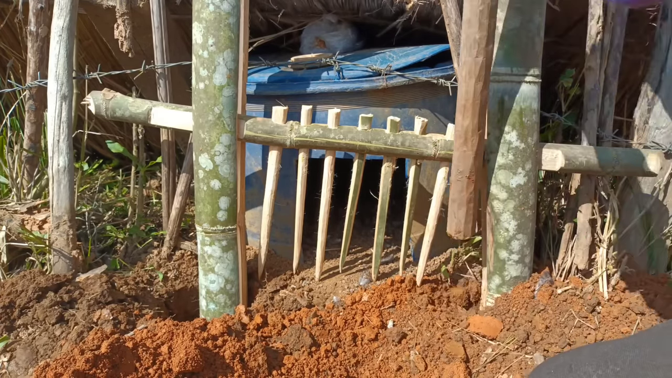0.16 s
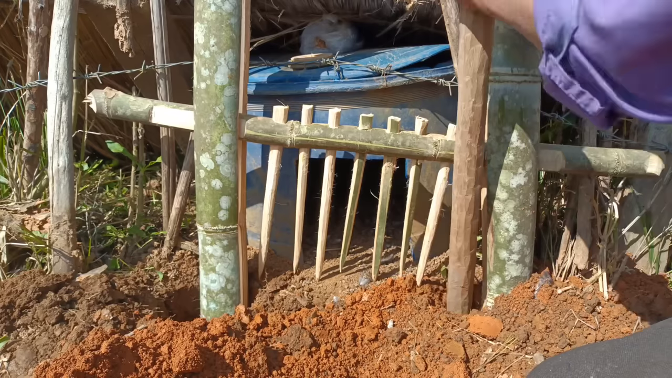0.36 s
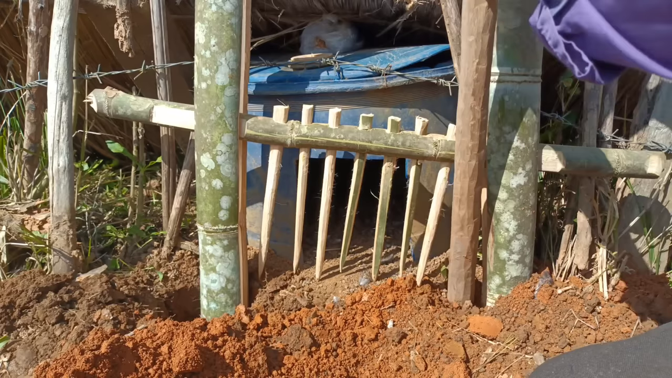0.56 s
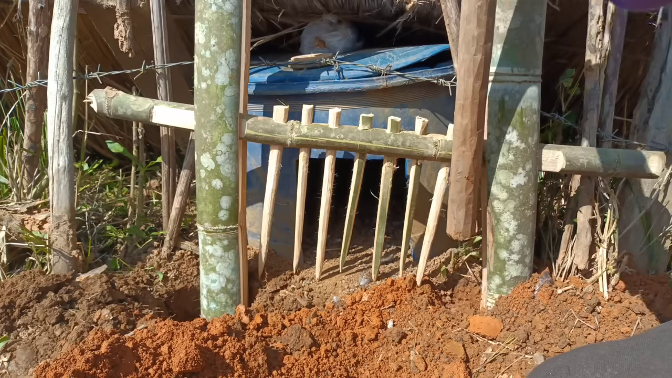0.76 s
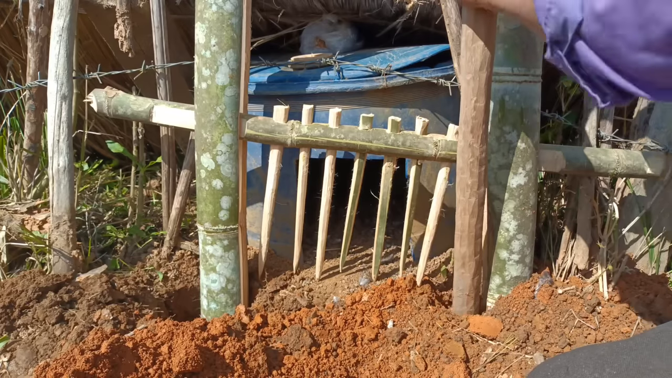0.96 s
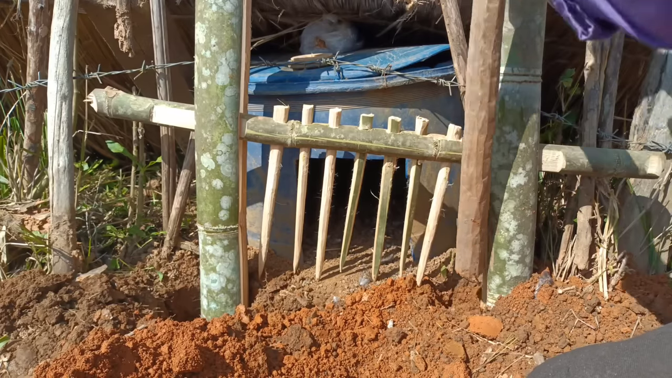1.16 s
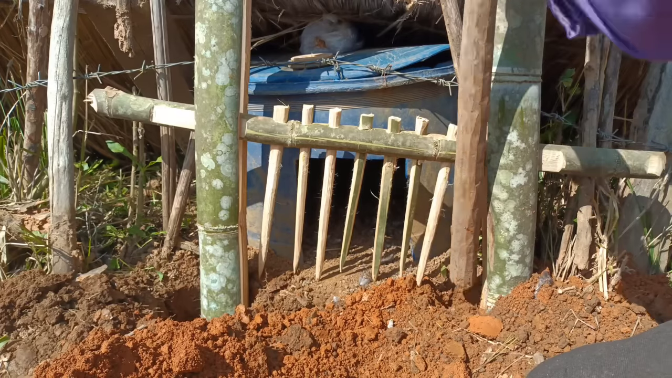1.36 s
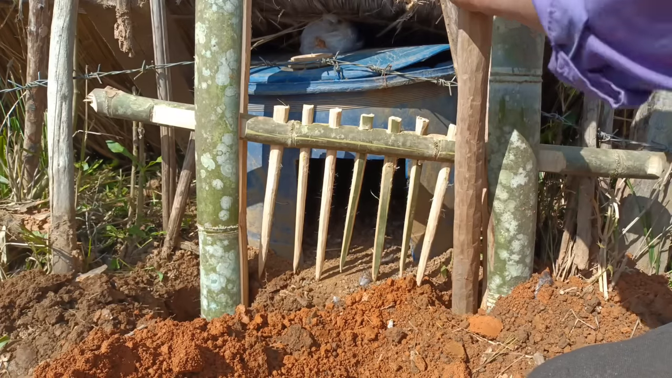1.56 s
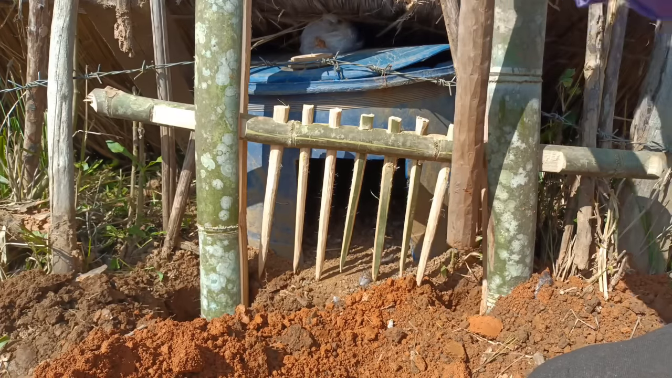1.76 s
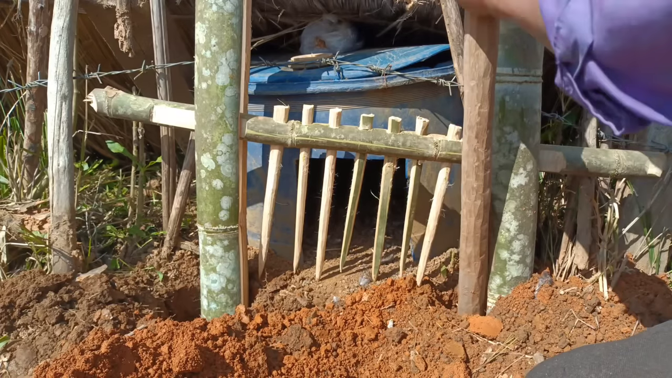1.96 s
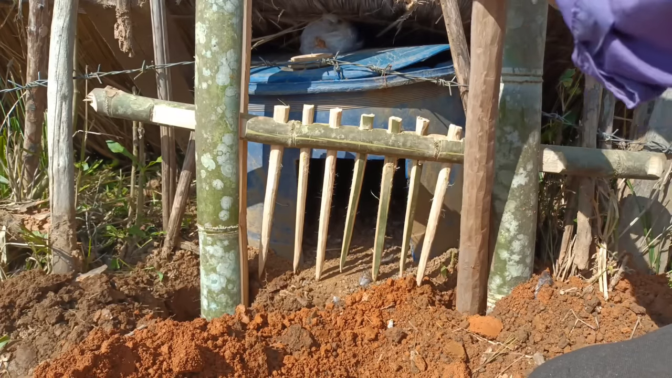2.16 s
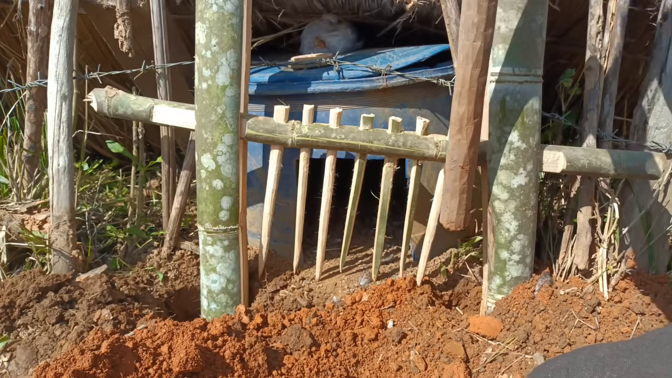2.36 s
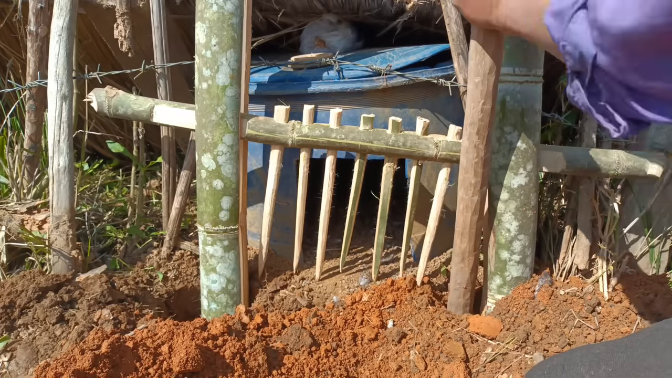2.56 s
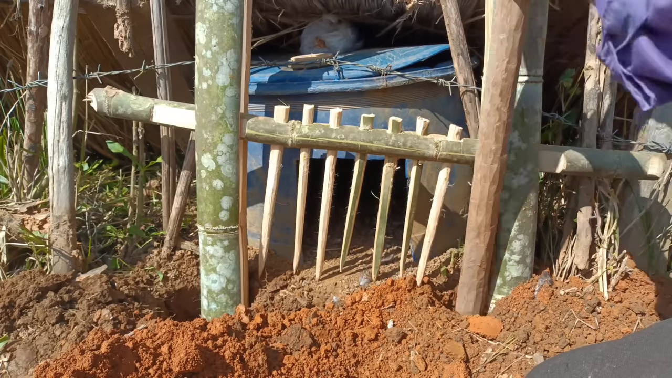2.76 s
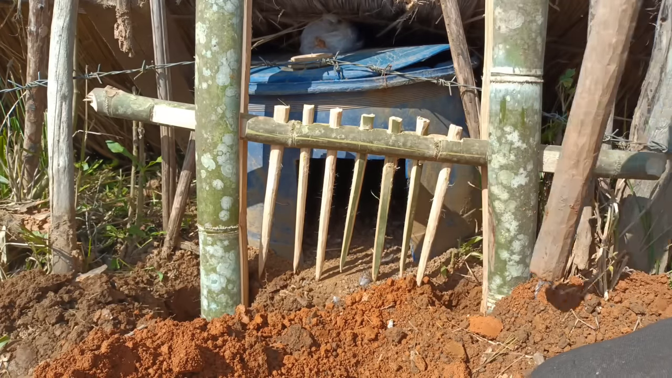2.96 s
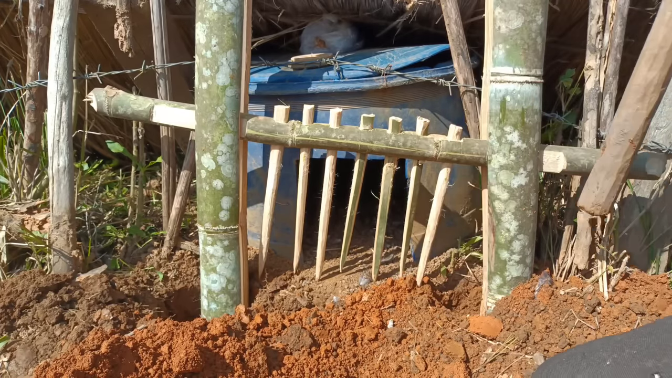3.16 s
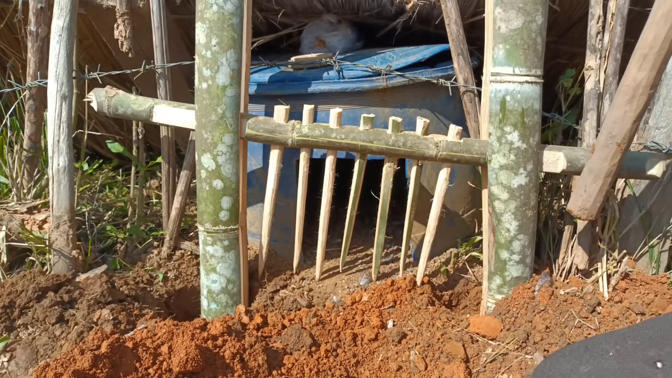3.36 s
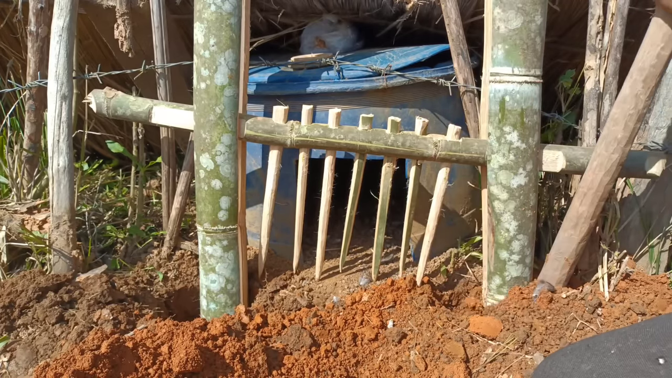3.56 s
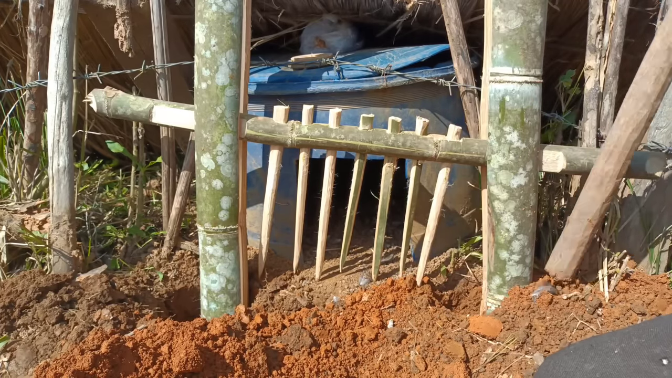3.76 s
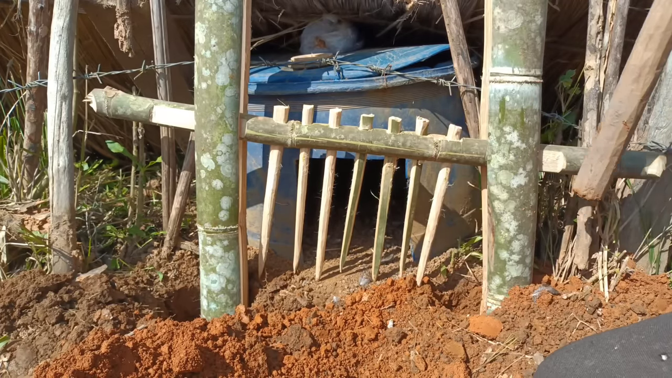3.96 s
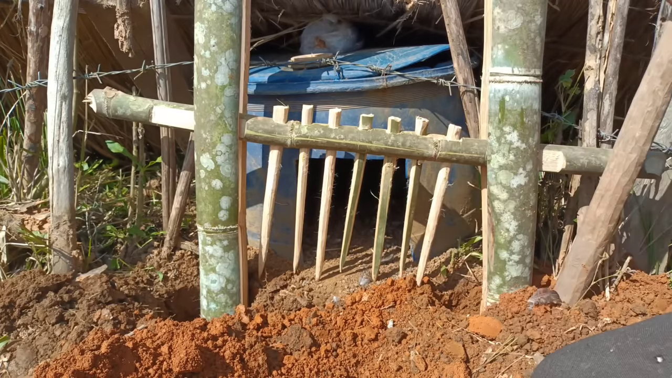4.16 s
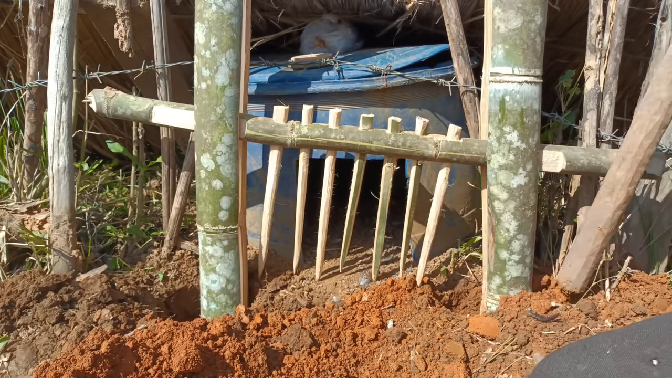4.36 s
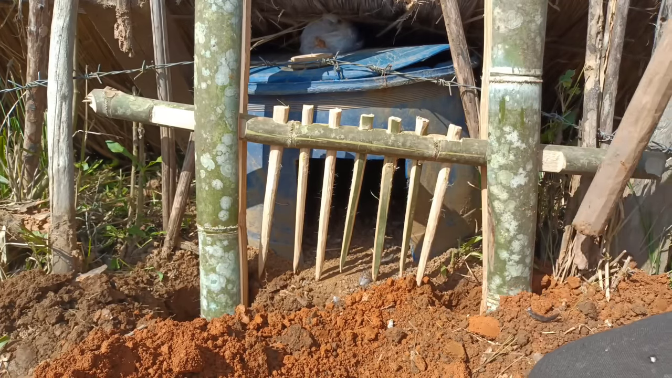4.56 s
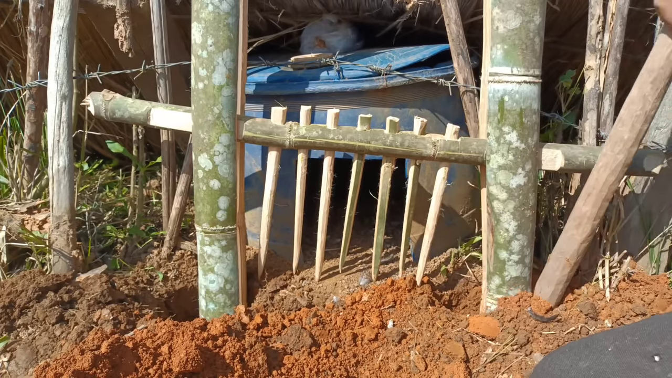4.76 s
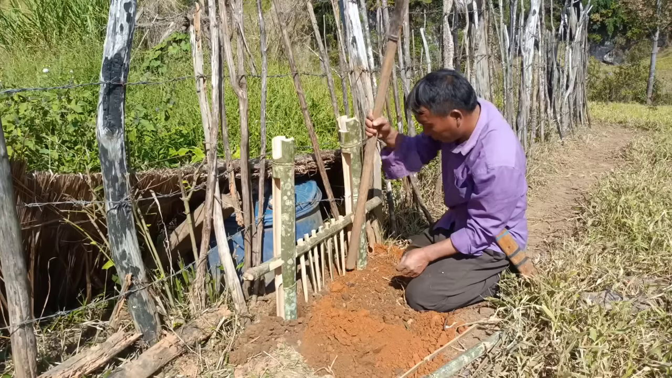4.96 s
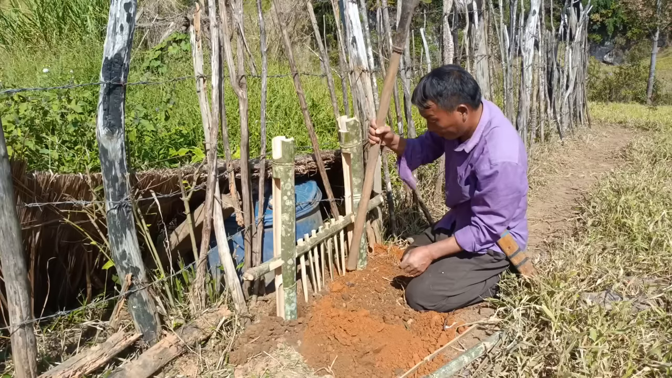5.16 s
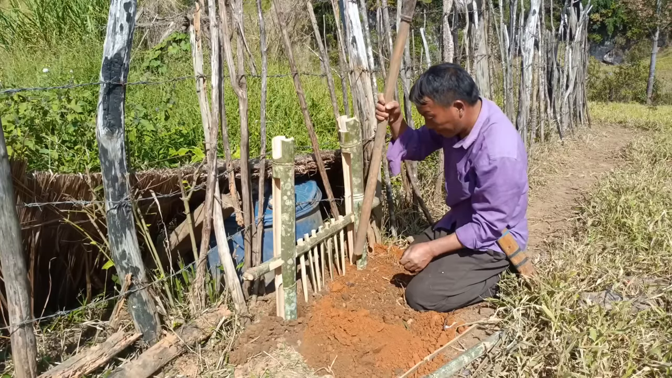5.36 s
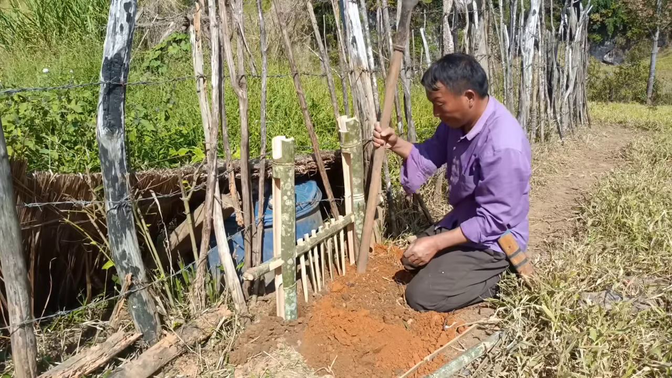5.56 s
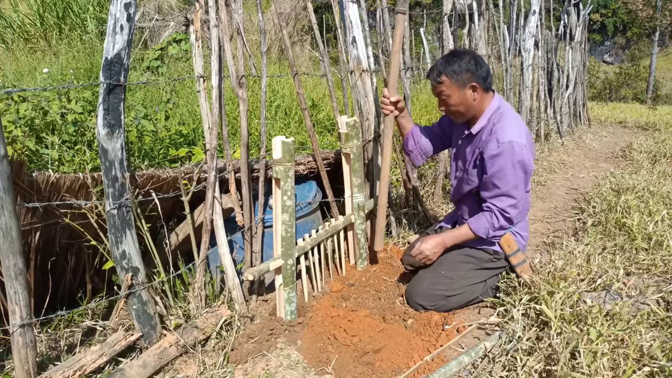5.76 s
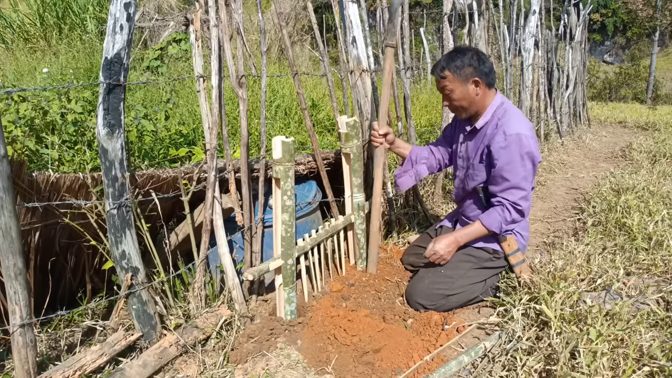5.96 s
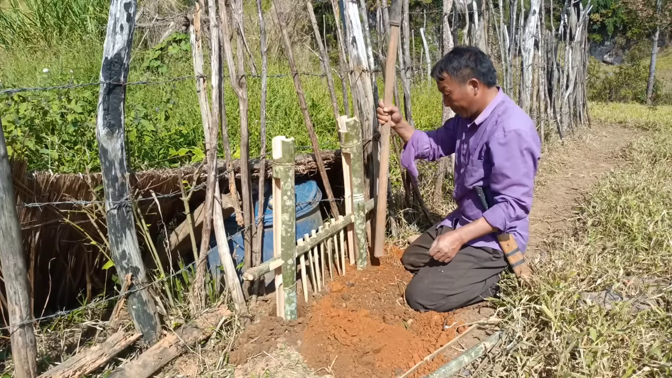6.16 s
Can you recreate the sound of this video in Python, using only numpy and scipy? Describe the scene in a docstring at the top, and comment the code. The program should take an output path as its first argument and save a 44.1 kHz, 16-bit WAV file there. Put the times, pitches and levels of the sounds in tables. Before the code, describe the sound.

A wooden stake tamps loose soil around a bamboo post outdoors, close by and slightly right, with almost no echo. After a tiny scrape and light knocks from 0.1 s, strokes land at about 0.4, 0.95, 1.5, 2.05 and 2.6 s. Each is a dry woody crack, a short gritty crunch with scattering crumbs, and a low thud; the last two push deepest. A pause holds faint drags and very faint bird calls near 3.3 s. Softer, crumbly strokes follow at 3.5 and 4.15 s, then sharper hollow knocks around 4.7 s. Packed soil thuds tighter at 5.05, 5.5 and 6.0 s, with small slides and taps around 5.3 s. Metal clinks at 5.06 s and more brightly at 6.1 s. Light wind rumble, soft puffs on the left, mostly 1.3 to 2.5 s, and thin leaf hiss stay behind, with a barely perceptible low hum midway.

```python
"""A wooden stake tamps loose soil around a bamboo fence post, about twice a second, on a quiet day outdoors.
Tip on clods or shaft on post: a noise crack plus decaying modes. Crumbs: random grains swelling into each landing.
Ground: a low push, then modes that rise in pitch and shorten as the soil packs; the post answers dully.
Drags and slides are bands of small slips; two metallic clinks near the end are a tick plus ringing modes.
Behind: filtered-noise wind rumble and leaf hiss, eddy pulses on the left, faint bird calls and a low hum."""
import sys
import numpy as np
from scipy import signal
from scipy.fft import rfft, irfft, next_fast_len
from scipy.io import wavfile

SR = 44100
rng = np.random.default_rng(int(sys.argv[2]) if len(sys.argv) > 2 else 0)


def waveform_to_disk(signal):
    """Save audio, clipped to [-1, 1], as 16-bit WAV at the path in sys.argv[1]."""
    frames = np.transpose(np.atleast_2d(signal))
    scaled = np.clip(frames, -1, 1) * 32767
    samples = np.round(scaled).astype(np.int16)
    wavfile.write(sys.argv[1], SR, samples)


N = 273861
AGE_S = np.arange(SR // 2) / SR    # time axis of one event


def from_db(db):
    """Amplitude ratio of a level in dB."""
    return 10 ** (np.asarray(db) / 20)


def rms_one(x):
    """Scale to unit rms over all channels."""
    return x / np.sqrt(np.mean(x ** 2) + 1e-20)


def white(*shape):
    """Gaussian white noise."""
    return rng.standard_normal(shape)


def dying(age_s, t60_s):
    """Gain of a free decay, -60 dB at t60."""
    return np.exp(-np.log(1000) * age_s / t60_s)


def onset(rise_s):
    """Exponential rise towards full level."""
    return 1 - np.exp(-AGE_S / rise_s)


def swell(half_s):
    """Gaussian rise and fall about the middle of the event; half_s is its sigma."""
    return np.exp(-((AGE_S - AGE_S.mean()) / half_s) ** 2 / 2)


def curve(points, s):
    """Read a (time, value) table by linear interpolation."""
    return np.interp(s, *np.transpose(points))


def at_hz(points, hz):
    """Read a spectrum on a log-frequency axis."""
    point_hz, value = np.transpose(points)
    return np.interp(np.log(hz + 1), np.log(point_hz), value)


def cut(x, hz, kind="low", order=2):
    """Butterworth low- or high-pass."""
    sos = signal.butter(order, np.clip(hz, 10, SR * .45), kind, fs=SR, output="sos")
    return signal.sosfilt(sos, x)


def add(out, s, sound):
    """Mix a sound in from time s, trimmed to the scene."""
    start = round(s * SR)
    sound = sound[..., max(-start, 0):N - start]
    first = max(start, 0)
    out[:, first:first + sound.shape[-1]] += sound


# place of the blows: (t/s, left-channel lag/s)
PLACE = [(2.8, .00004), (3.2, 0.00021), (4.85, .00015), (4.9, .000005)]


def placed(pair, s):
    """The sound reaches the left channel a little later than the right."""
    lag = round(abs(curve(PLACE, s)) * SR)
    left = np.pad(pair[0], (lag, 0))[:pair.shape[1]]
    return np.array([left, pair[1]])


def coloured(pair, spectrum, likeness, tilt_db=0):
    """Two unrelated noises become left and right with a given colour and likeness; rms 1."""
    length = pair.shape[1]
    size = next_fast_len(length)
    hz = np.arange(size // 2 + 1) * SR / size
    octaves = np.log2(np.maximum(hz, 500) / 500)    # tilt acts above 500 Hz
    mid, side = rfft(pair, size) * from_db(at_hz(spectrum, hz) + tilt_db * octaves)
    alike = np.clip(at_hz(likeness, hz), 0, 1)
    spread = np.sqrt(1 - alike) * side * [[1], [-1]]
    return rms_one(irfft(np.sqrt(1 + alike) * mid + spread, size)[:, :length])


def grains(per_s, spread_db):
    """Two random trains of tiny fractures of uneven size."""
    shape = (2, len(AGE_S))
    sizes = from_db(spread_db * np.minimum(rng.exponential(1, shape), 3))
    hits = rng.random(shape) < per_s / SR
    return hits * sizes * rng.choice([-1, 1], shape)


def struck(modes, hardness_hz, vary_db, side_hz, ring=1):
    """A blow rings every mode with a strength of its own; left and right phases part with frequency."""
    hz, level_db, t60_s = np.transpose(modes)[:, :, None]
    gain = from_db(level_db + vary_db * white(*hz.shape))
    gain = gain / np.sqrt(1 + (hz / hardness_hz) ** 4)    # soft contacts excite less treble
    gain = gain / np.sqrt(np.sum(gain ** 2) / 2)
    phase = rng.uniform(0, 2 * np.pi, hz.shape) + 2 * np.pi * hz * AGE_S
    skew = np.minimum(hz / side_hz, np.pi / 4) * rng.choice([-1, 1], hz.shape)
    body = gain * dying(AGE_S, t60_s * ring)
    return np.array([np.sum(body * np.sin(phase + way * skew), axis=0) for way in (-1, 1)])


def narrow(hz, width_hz, size):
    """A wavering tone: noise twice through one narrow resonance, independent per channel."""
    b, a = signal.iirpeak(hz, hz / width_hz, SR)
    once = signal.lfilter(b, a, white(2, size))
    return rms_one(signal.lfilter(b, a, once))


# air noise colour: (f/Hz, relative level/dB)
AIR = [(12, -27), (20, 4.5), (49, -5), (95, -16), (123, -12), (209, -17), (268, -21), (365, -19),
       (456, -20.5), (539, -21.5), (1050, -27.5), (1250, -26.5), (1510, -29.5), (2500, -26.5),
       (15800, -41.5)]
# left-right likeness of the air: (f/Hz, likeness 0-1)
AIR_LIKENESS = [(30, 0.26), (120, 0.58), (500, 0.24), (2000, 0.033), (6000, 0.028)]
# wind rumble before channel gains: (t/s, level/dB)
RUMBLE = [(0.0, -68.5), (1.23, -69), (1.67, -61.5), (1.83, -70), (2.64, -66.5), (4.77, -72), (4.87, -71),
          (5.87, -73.5), (6.2, -70.5)]
# hiss of far leaves before the hiss gain: (t/s, level/dB)
LEAVES = [(0.0, -72.5), (0.33, -73.5), (1.12, -76), (2.81, -74.5), (4.56, -77.5), (5.22, -74.5),
          (5.65, -76), (6.2, -75)]


def breeze(windward_db, lee_db, hiss_gain_db, rustle_db):
    """Light air rumbles, a little more on the left, and rustles unevenly in the far leaves."""
    t_s = np.arange(N) / SR
    air = coloured(white(2, N), AIR, AIR_LIKENESS)
    rumble = rms_one(cut(air, 230, order=3))
    rest = cut(air, 270, "high", order=3)
    hiss = 0
    # peel off bands from the bottom; each flickers on its own
    for hz in np.geomspace(600, 14000, 9):
        band = signal.sosfiltfilt(signal.butter(2, hz, fs=SR, output="sos"), rest)
        rest = rest - band
        hiss = hiss + band * from_db(rustle_db * rms_one(cut(white(N), 7.5)))
    rumble_gain = from_db(curve(RUMBLE, t_s) + np.array([[windward_db], [lee_db]]))
    hiss_gain = from_db(curve(LEAVES, t_s) + hiss_gain_db)
    return rumble_gain * rumble + hiss_gain * rms_one(hiss + rest)


# strongest puffs of wind on the left: (t/s, peak level/dB, half width/s)
PUFFS = [(1.284, -36.5, 0.0041), (1.553, -35.5, 0.0032), (1.608, -37, 0.0039), (1.765, -32, 0.0042),
         (1.784, -32.5, 0.0022), (1.813, -30.5, 0.0034), (1.988, -39.5, .0033), (2.512, -39.5, 0.0047)]
# weaker random eddies; peaks relative to the RUMBLE table
EDDIES_PER_S, EDDY_OVER_TABLE_DB, EDDY_SPREAD_DB, EDDY_HALF_WIDTH_S = 7, 13.5, 1.5, 0.0039


def puffs(right_db):
    """Eddies cross the left channel as single soft pressure swings, the random ones following the wind."""
    out, lead_s = np.zeros((2, N)), .05
    times_s = np.flatnonzero(rng.random(N) < EDDIES_PER_S / SR) / SR
    peaks_db = curve(RUMBLE, times_s) + EDDY_OVER_TABLE_DB + EDDY_SPREAD_DB * white(len(times_s))
    eddies = [(s, peak_db, EDDY_HALF_WIDTH_S) for s, peak_db in zip(times_s, peaks_db)]
    for s, level_db, half_width_s in [*PUFFS, *eddies]:
        u = (AGE_S - lead_s) / half_width_s
        swing = (1 - u ** 2) * np.exp(-u ** 2 / 2)
        add(out, s - lead_s, from_db([[level_db], [level_db + right_db]]) * swing)
    return out


# dragging wood, sliding earth: (middle t/s, level/dB, half length/s, centre f/Hz, slips/s)
SCRAPES = [(0.07, -70.5, 0.046, 2190, 1000), (0.117, -57.5, .008, 3220, 6600),
           (0.622, -73, 0.039, 1940, 1100), (2.848, -71.5, 0.04, 2010, 400),
           (3.062, -67.5, 0.051, 5300, 10000), (3.942, -64.5, 0.015, 365, 1600),
           (4.143, -50, 0.0043, 3130, 2500), (5.287, -62.5, 0.013, 700, 1000),
           (5.347, -54, 0.021, 910, 1800), (5.439, -68.5, 0.0094, 1000, 1900),
           (5.824, -74, 0.093, 5900, 3400)]
# left-right likeness of soil sounds: (f/Hz, likeness 0-1)
SOIL_LIKENESS = [(400, 1), (2000, 0.46), (4000, 0.68), (8000, 0.062)]


def scrapes(skirt_db):
    """Uneven little slips under a smooth swell, in a broad band."""
    out = np.zeros((2, N))
    for s, level_db, half_s, hz, per_s in SCRAPES:
        band = [(hz * 2. ** octave, -skirt_db * octave ** 2) for octave in range(-3, 4)]
        rub = coloured(grains(per_s, spread_db=1.5), band, SOIL_LIKENESS)
        add(out, s - AGE_S.mean(), from_db(level_db) * rub * swell(half_s))
    return out


# wood contacts: (t/s, level/dB, share taken by the post 0-1, tock level/dB, tock f/Hz)
KNOCKS = [(0.111, -54, 0.3, -53, 2430), (.215, -41, 0.72, -47, 676), (0.225, -42, 0.93, -44.5, 445),
          (0.285, -53.5, 0.64, -55, 553), (.361, -32.5, 0.6, -52, 660), (0.389, -41, 0.64, -44, 3500),
          (.401, -39, 0, -42, 2530), (0.9431, -40.5, 0.37, -48, 2510), (.954, -38, 0.41, -39.5, 2530),
          (1.4845, -37.5, 0.7, -59, 650), (1.4902, -29, 0.11, -37, 650), (2.042, -37.5, 0.58, -49, 572),
          (2.052, -34.5, 0.15, -39, 683), (2.11, -56, 1, -45.5, 555), (2.613, -30.5, 0.06, -38.5, 973),
          (2.618, -33, 0, -32, 2444), (3.509, -44, 0.18, -48, 1025), (3.527, -41, 0, -42, 1152),
          (3.707, -48, 0.42, -52.5, 793), (3.928, -50.5, 0.04, -45, 402), (4.137, -53, 0.8, -47, 610),
          (4.692, -34.5, 0.58, -40, 1030), (4.718, -39.5, 0.9, -38, 1120), (4.749, -39, 0.75, -38, 563),
          (4.814, -53.5, 0.8, -49, 540), (4.951, -53.5, 0.72, -51.5, 379), (5.273, -57, .9, -54, 440),
          (5.301, -51.5, 0.82, -50, 503), (5.323, -57, .4, -65, 555), (5.525, -55, 0.46, -48, 2610)]
# stake modes: (f/Hz, relative level/dB, t60/s)
STAKE = [(342, -30.5, 0.011), (682, 1, 0.022), (961, -6.5, 0.06), (1398, -3, 0.031), (1640, -1.5, 0.034),
         (2012, -5.5, 0.042), (2568, 2.5, 0.017), (3026, -4, 0.018), (3990, -1, 0.025), (4715, -26, 0.13),
         (5660, -4.5, 0.041), (6940, -32, 0.007)]
# bamboo post modes: (f/Hz, relative level/dB, t60/s)
POST = [(207.5, -13, 0.2), (358.8, -12, 0.26), (438, -11, 0.1), (596, -1.5, 0.073), (684, 1.5, 0.036),
        (864, -10.5, 0.09), (1062, 0, 0.046), (1227, -6, 0.065), (1520, -8.5, 0.061), (1632, -18.5, 0.078),
        (2206, -4.5, 0.028), (2600, -23, 0.04), (3804, -7.5, 0.053)]
# soil noise colour: (f/Hz, relative level/dB)
SOIL = [(240, 1.5), (400, -4.5), (1020, -9), (1750, -8.5), (2530, -7), (3290, -7.5), (5060, -12.5),
        (5720, -13.5), (6470, -15.5), (7440, -11), (10300, -25.5), (15800, -29.5)]
# tip on a clod is hard; shaft on the post is softer and bounces once
TIP_HARDNESS_HZ, SHAFT_HARDNESS_HZ = 6140, 2000
BOUNCE_S, BOUNCE_DB = .015, -9
BLOW_SPREAD_DB = 2.5    # random spread of mode levels


def knocks(crack_db, crack_t60_s, tock_t60_s):
    """A contact cracks and rings stake and post; the struck spot adds a tock of its own."""
    out = np.zeros((2, N))
    attack = onset(.0008)    # short soft attack, under a millisecond
    for s, level_db, share, tock_db, tock_hz in KNOCKS:
        share = np.clip(share, 0, 1)
        hardness_hz = TIP_HARDNESS_HZ * (SHAFT_HARDNESS_HZ / TIP_HARDNESS_HZ) ** share
        stake = (1 - share) * struck(STAKE, hardness_hz, BLOW_SPREAD_DB, side_hz=4200)
        post = share * struck(POST, hardness_hz, BLOW_SPREAD_DB, side_hz=2670)
        tock = from_db(tock_db) * struck([(tock_hz, 0, tock_t60_s)], hardness_hz, 0, side_hz=4030)
        grit = coloured(white(2, len(AGE_S)), SOIL, SOIL_LIKENESS)
        crack = from_db(crack_db) * cut(grit, hardness_hz) * dying(AGE_S, crack_t60_s)
        blow = from_db(level_db) * (stake + post + crack) + tock
        rebound = struck(POST, hardness_hz, BLOW_SPREAD_DB, side_hz=2490)
        bounce = share * from_db(level_db + BOUNCE_DB) * rebound
        add(out, s, placed(blow * attack, s))
        add(out, s + BOUNCE_S, placed(bounce * attack, s))
    return out


# landings in the soil: (t/s, crunch level/dB, sinking time/s, crumbling t60/s,
# push level/dB, ground ring level/dB)
STROKES = [(.398, -41, 0.015, 0.068, -49, -39.5), (.963, -43.5, 0.0091, 0.062, -34, -46.5),
           (1.494, -41.5, 0.0056, 0.043, -28.5, -43), (2.051, -38.5, 0.0055, 0.034, -17, -34),
           (2.619, -39, 0.0018, 0.046, -16, -34), (3.541, -49, .016, 0.25, -39.5, -43),
           (4.164, -46, 0.011, 0.11, -29.5, -34), (4.724, -37, .012, 0.093, -37, -32),
           (5.070, -45.5, 0.0024, 0.087, -38, -29.5), (5.530, -49, .0079, 0.061, -29.5, -33),
           (6.006, -48.5, .011, 0.059, -32.5, -38)]
# coarse crumbs break first; fine ones spill aside just after the stake has sunk in
COARSE_TILT_DB_PER_OCTAVE, FINE_TILT_DB_PER_OCTAVE = -1, 4.5
SPILL_DB, SPILL_DELAY_S, SPILL_SWELL_S, SPILL_T60_S = -12, 0.0066, 0.0047, .06


def crunches(settle_db, settle_t60_s):
    """Crumbs crunch ever louder as the stake sinks; fine ones spill aside, loosened bits patter on."""
    out, lead_s = np.zeros((2, N)), .06
    after_s, before_s = np.maximum(AGE_S - lead_s, 0), np.maximum(lead_s - AGE_S, 0)
    for landing_s, crunch_db, sink_s, crumble_t60_s, *_ in STROKES:
        spill_s = landing_s + sink_s / 2 + SPILL_DELAY_S
        coarse = (landing_s, crunch_db, sink_s, crumble_t60_s, COARSE_TILT_DB_PER_OCTAVE)
        fine = (spill_s, crunch_db + SPILL_DB, SPILL_SWELL_S, SPILL_T60_S, FINE_TILT_DB_PER_OCTAVE)
        for s, level_db, swell_s, t60_s, tilt_db in (coarse, fine):
            crush = coloured(grains(per_s=9000, spread_db=-1.0), SOIL, SOIL_LIKENESS, tilt_db)
            patter = coloured(grains(per_s=960, spread_db=4), SOIL, AIR_LIKENESS, tilt_db)
            crumbs = crush * dying(after_s, t60_s)
            crumbs = crumbs + from_db(settle_db) * patter * dying(after_s, settle_t60_s)
            rise = np.exp(-(before_s / swell_s) ** 2)
            add(out, s - lead_s, placed(from_db(level_db) * rise * crumbs, s))
    return out


# modes of packed soil with the post in it, before packing ratios: (f/Hz, relative level/dB, t60/s)
GROUND = [(93.3, -4, 0.16), (141.6, -2, 0.19), (161.2, -0.5, 0.12), (224.4, -11.5, 0.071),
          (254.7, -13, 0.093), (336.4, -21.5, 0.15)]
# packing: pitch ratio rises, ring-time ratio shrinks
LOOSE_PITCH, PITCH_RISE_PER_S = .93, 0.017
LOOSE_RING, RING_LOSS_PER_S = 1.425, 0.089


def thuds(push_hz, push_rise_s, ring_rise_s, shudder_db, shudder_hz, shudder_t60_s):
    """The soil yields in a few fast-dying low swings; the packed ground rings and shudders briefly."""
    out = np.zeros((2, N))
    hz, level_db, t60_s = np.transpose(GROUND)[:, :, None]
    signs = (-1) ** np.arange(len(GROUND))[:, None]
    for s, *_, push_db, ring_db in STROKES:
        pitch = LOOSE_PITCH + PITCH_RISE_PER_S * s
        hold = LOOSE_RING * np.exp(-RING_LOSS_PER_S * s)
        # firmer soil springs back faster
        push = np.sin(2 * np.pi * push_hz * pitch ** 2 * AGE_S) * dying(AGE_S, .08) * onset(push_rise_s)
        tones = np.sin(2 * np.pi * hz * pitch * AGE_S) * dying(AGE_S, t60_s * hold)
        modes = np.sum(signs * from_db(level_db) * tones, axis=0)
        shudder = rms_one(cut(cut(white(len(AGE_S)), shudder_hz, order=5), 77, "high"))
        shudder = from_db(shudder_db) * shudder * dying(AGE_S, shudder_t60_s * hold)
        ring = (modes + shudder) * onset(ring_rise_s)
        add(out, s, from_db(push_db) * push + from_db(ring_db) * ring)
    return out


SHAKE_DB, SHAKE_HARDNESS_HZ = -19, 890    # level relative to the ground ring


def post_shake():
    """The post stands in the tamped soil and answers every landing with a dull ring."""
    out = np.zeros((2, N))
    for s, _, sink_s, *_, ring_db in STROKES:
        ring = struck(POST, SHAKE_HARDNESS_HZ, BLOW_SPREAD_DB, side_hz=2510) * onset(0.003)
        add(out, s + sink_s, from_db(ring_db + SHAKE_DB) * ring)
    return out


# faint far bird calls: (middle t/s, level/dB, half length/s, f/Hz)
BIRDS = [(1.768, -72, 0.026, 3920), (3.202, -72, 0.034, 3970), (3.388, -77, .02, 4740)]


def bird_calls(width_hz):
    """Far birds, blurred by the distance into swelling bands of noise."""
    out = np.zeros((2, N))
    for s, level_db, half_s, hz in BIRDS:
        call = narrow(hz, width_hz, len(AGE_S))
        add(out, s - AGE_S.mean(), from_db(level_db) * call * swell(half_s))
    return out


# faint low hum: (t/s, level/dB)
HUM = [(2.7, -100), (3.25, -78), (4.1, -76.5), (4.8, -85.5)]


def low_hum(hz, width_hz):
    """A wavering low tone, the same in both channels, comes and goes."""
    tone = narrow(hz, width_hz, N)[0]
    return np.zeros((2, N)) + tone * from_db(curve(HUM, np.arange(N) / SR))


# metallic clinks: (t/s, level/dB, share of free ring time, contact hardness f/Hz)
CLINKS = [(5.0648, -44, 0.65, 6040), (6.1056, -35.5, 0.96, 15100)]
# metal modes, ringing freely: (f/Hz, relative level/dB, t60/s)
METAL = [(1280, -5.5, 0.11), (2590, -11, 0.12), (2880, -6.5, 0.17), (3610, -4.5, 0.07), (4380, 4.5, 0.1),
         (5910, -3, 0.049), (6900, -4, 0.057), (7490, -9, 0.31), (8640, 0, 0.047), (9700, -16, 0.028),
         (13200, -11, .03)]


def clinks(left_db, tick_db, tick_t60_s):
    """A hard tick sets a small piece of metal ringing, a little to the left."""
    out = np.zeros((2, N))
    for s, level_db, ring, hardness_hz in CLINKS:
        tone = struck(METAL, hardness_hz, 0, side_hz=1700, ring=ring)
        tick = rms_one(cut(cut(white(2, len(AGE_S)), 2200, "high"), 6900)) * dying(AGE_S, tick_t60_s)
        gain = from_db(level_db + left_db * np.array([[1], [-1]]))
        add(out, s, gain * (tone + from_db(tick_db) * tick))
    return out


def yard(x, echo_db, echo_t60_s, dull_hz):
    """Fence and ground scatter a faint, short tail: convolution with decaying dull noise."""
    tail = cut(white(2, len(AGE_S)), dull_hz, order=1) * dying(AGE_S, echo_t60_s) * onset(0.004)
    tail = tail / np.sqrt(np.sum(tail ** 2) / 2)
    mono = x.mean(axis=0, keepdims=True)
    return x + from_db(echo_db) * signal.fftconvolve(mono, tail, axes=1)[:, :N]


def scene():
    """The strokes sound slightly to the right, over the quiet yard."""
    air = breeze(windward_db=7.5, lee_db=5.5, hiss_gain_db=5.5, rustle_db=2.0) + puffs(right_db=-40)
    strokes = scrapes(skirt_db=4.5) + knocks(crack_db=4.5, crack_t60_s=0.014, tock_t60_s=0.039)
    strokes = strokes + crunches(settle_db=-18.5, settle_t60_s=0.5) + post_shake()
    ground = thuds(push_hz=81.2, push_rise_s=0.013, ring_rise_s=0.0023,
                   shudder_db=-9.5, shudder_hz=178, shudder_t60_s=0.27)
    far = bird_calls(width_hz=760) + low_hum(hz=266, width_hz=8.2)
    metal = clinks(left_db=1.8, tick_db=-3.5, tick_t60_s=0.044)
    bright = strokes * from_db([[-.9], [.9]]) + metal
    return yard(bright, echo_db=-26.5, echo_t60_s=0.3, dull_hz=3000) + ground + far + air


def record(dry):
    """The top is cut steeply, above 15.9 kHz."""
    return signal.sosfilt(signal.ellip(10, .1, 70, 15900, fs=SR, output="sos"), dry)


dry = scene()
out = record(dry)
waveform_to_disk(out)
```